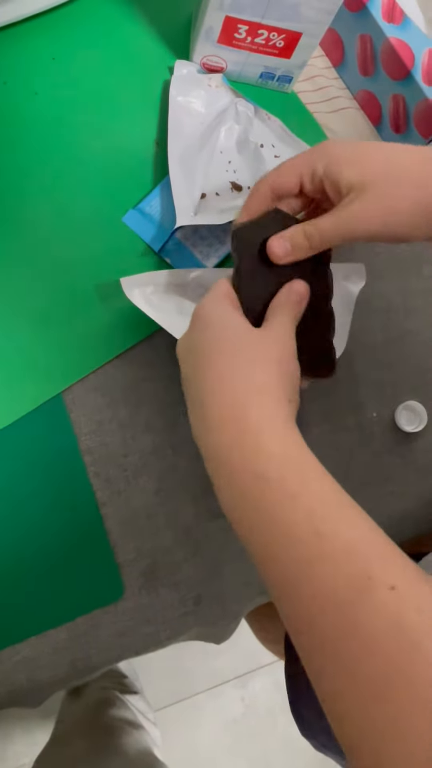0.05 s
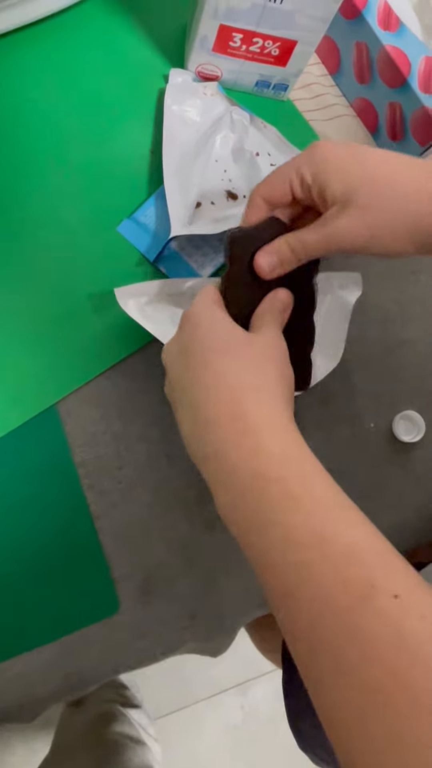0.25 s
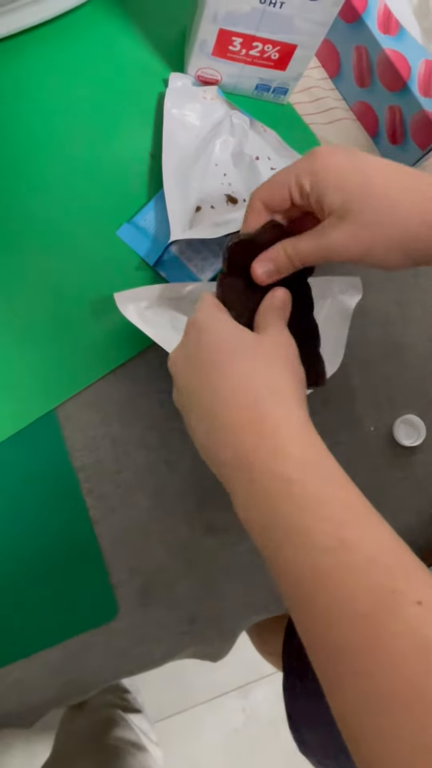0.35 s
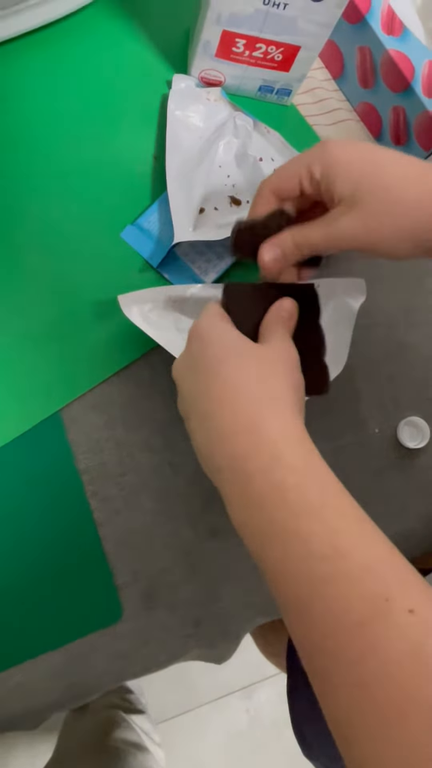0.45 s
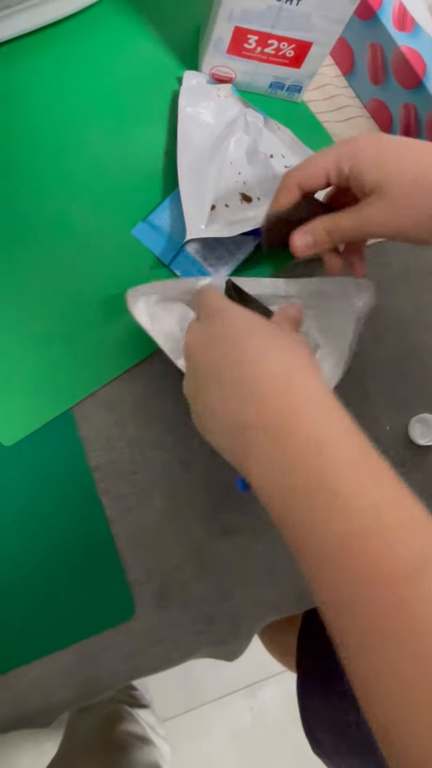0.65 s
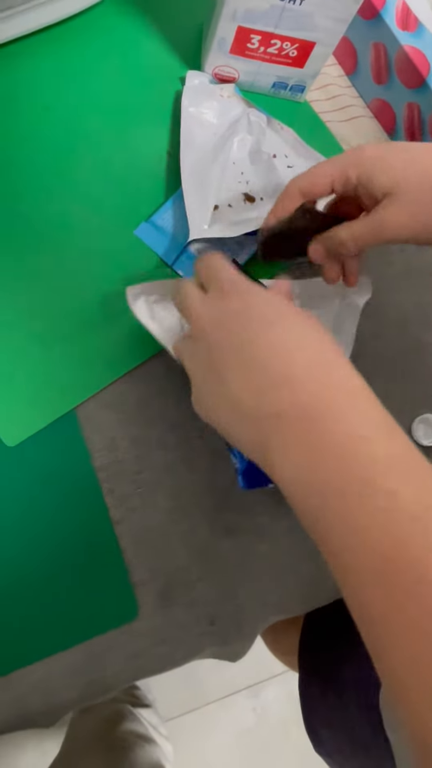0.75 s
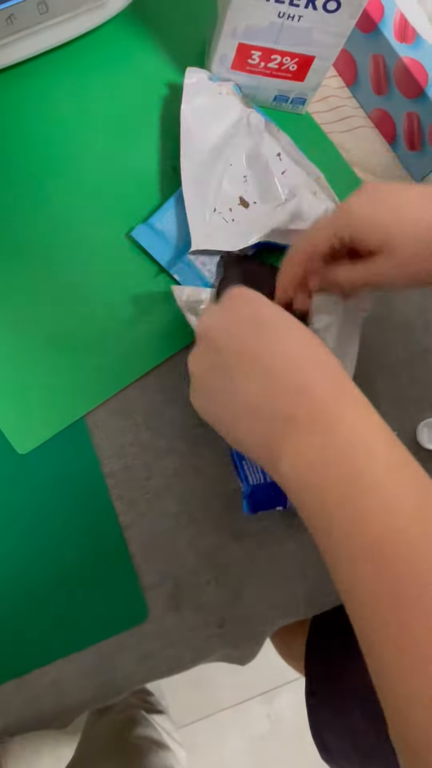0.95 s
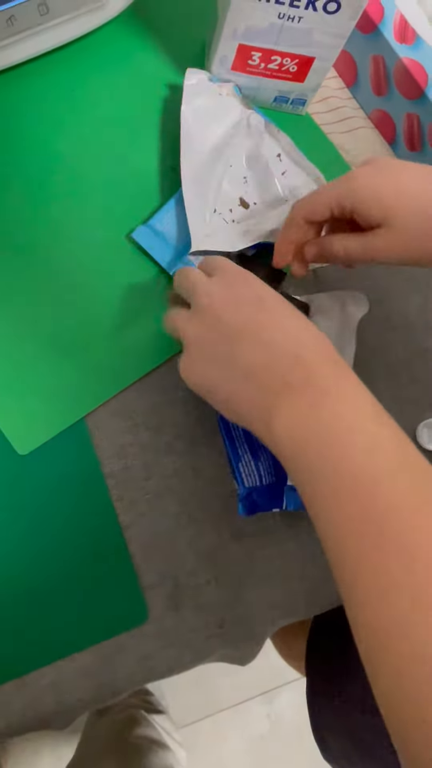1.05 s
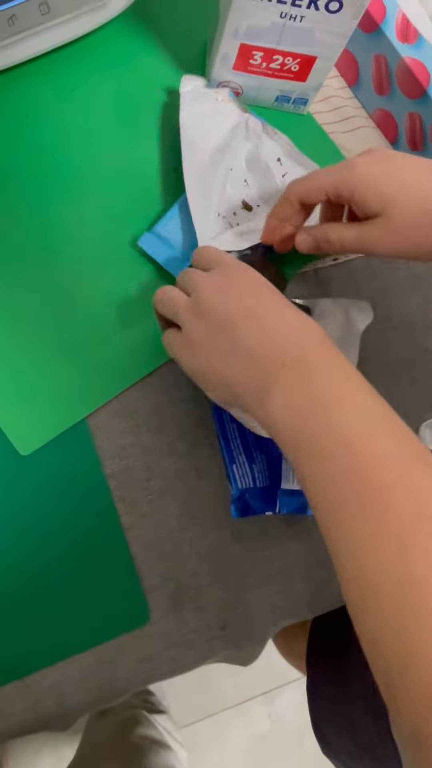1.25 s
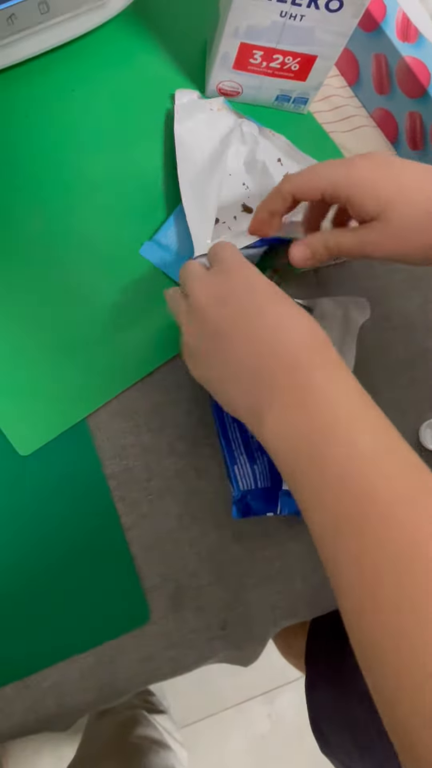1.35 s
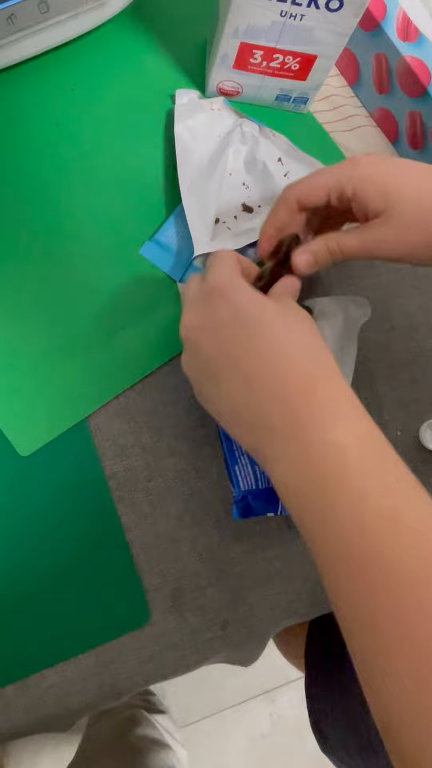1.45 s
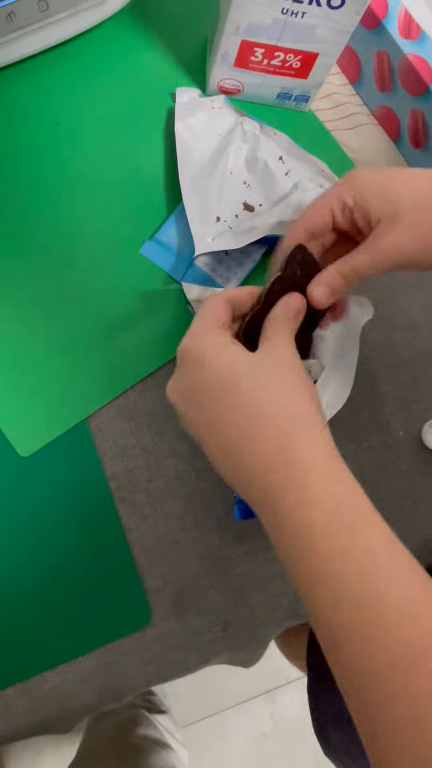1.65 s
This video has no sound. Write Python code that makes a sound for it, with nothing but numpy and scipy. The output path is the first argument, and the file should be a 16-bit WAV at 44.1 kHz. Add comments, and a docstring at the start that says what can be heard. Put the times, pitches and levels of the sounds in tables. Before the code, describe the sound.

One crisp snap of chocolate broken by hand, followed by light wrapper rustling and clicks.

```python
"""A chocolate bar is snapped by hand: brittle fracture excites its short-lived modes.
The pieces are laid in their wrapper, which crackles as it buckles and rustles as it is rubbed.
They knock, tick and scrape, and bumps set the low modes of the table ringing.
The sound reaches a close stereo microphone left side first, followed by the echoes and short
reverberation of a small kitchen, over faint noise and the hum of an appliance."""
import sys
import numpy as np
from scipy import signal
from scipy.fft import rfft, irfft
from scipy.io import wavfile

SR = 44100
rng = np.random.default_rng(int(sys.argv[2]) if len(sys.argv) > 2 else 0)


def generate_wav(signal):
    """Clip the signal to [-1, 1] and save it as 16-bit WAV at the path in sys.argv[1]."""
    frames = np.transpose(np.atleast_2d(signal))
    scaled = np.clip(frames, -1, 1) * 32767
    pcm = np.round(scaled).astype(np.int16)
    wavfile.write(sys.argv[1], SR, pcm)


N = 74970
TIME = np.arange(N) / SR

# Levels are relative: each source and path applies its own further gain.
# faint ticks lead into the snap, then the bar fractures: t/s, level/dB, contact time/ms
CRACKS = [(0.2212, -34.5, 0.061), (0.2274, -19, 0.083), (0.2298, -24, 0.13), (0.2324, -26.5, 0.078),
          (0.23467, -19, 0.016), (0.23516, -19, 0.046), (0.23549, 4.5, 0.068)]
# modes of the broken halves: f/Hz, level/dB, T60/s
BAR_MODES = [(265, -36.5, 0.015), (518, -34.5, 0.0049), (1210, -23, 0.0042), (1451, -16.5, 0.0088),
             (2624, -14, 0.016), (2813, -11, 0.018), (3100, -14.5, 0.017), (4100, -8.5, 0.0096),
             (6270, -10, 0.0035), (8630, -18, 0.0072), (11700, -25.5, 0.004), (14300, -22, .004)]
# the wrapper buckles: t/s, level/dB, body offset/dB, treble offset/dB, air offset/dB
BUCKLES = [(0.3676, -59, -2.5, 1.5, 7), (0.4632, -49, -14, 7, 5), (0.5052, -47.5, -7.5, -3.5, -7),
           (0.5209, -58, 2, 12.5, 12.5), (0.5575, -42.5, -2, -10, -20), (0.5705, -43, -2, -3, -1.5),
           (0.5991, -36, 0, -16, -15), (0.6023, -39.5, -2, -3, -5), (0.6152, -33, -8, -3, -7),
           (0.627, -65, -14, -2, -4), (0.6453, -41, 3.5, 9.5, -8), (0.656, -29.5, -14, -19, -19),
           (0.6604, -35.5, -29, -0.5, -3.5), (0.6709, -36, -12, -17, -20), (0.6792, -34, 3.5, -7.5, -18),
           (0.6977, -40.5, -29, -2, -19), (0.7023, -34.5, -24, -8, -23), (0.7172, -39, -30, -10, -23),
           (0.7462, -40, 0, -3, -17), (0.7519, -35, -4.5, -3.5, -16), (0.762, -35, -13, -7, -3.5),
           (0.781, -33, -7.5, 2.5, 0.5), (0.8797, -43, -4.5, -7.5, -22), (0.9389, -35.5, -8, -2, -24),
           (0.9529, -36, 1, -15, -27), (0.9575, -45, -5, -22, -24), (0.9617, -48, -9, -3, -19),
           (1.0656, -51.5, 2, 1.5, -31.5), (1.0821, -39, -17, 1.5, 0), (1.085, -40, -16, 3.5, 2),
           (1.093, -44, -7, 5, 9), (1.1049, -43.5, -5.5, 2.5, -1), (1.1698, -41.5, -9, -16, -9),
           (1.1824, -49.5, -6, 10, -8), (1.1918, -39.5, 0, 1, -8), (1.1945, -44.5, 5.5, 6, 4),
           (1.2019, -44, 1, 7, 8.5), (1.2147, -39, -4, -5, -21), (1.22, -38.5, -20, 5, -1.5),
           (1.2278, -65, -1, -5, 0), (1.2602, -50.5, -10, 2, 20), (1.263, -37, -13, 4.5, 3.5),
           (1.3629, -49, 0.5, -6.5, -12), (1.5372, -61, -3, 8, 6.5)]
# the wrapper is rubbed: peak t/s, half-width/s, level/dB, tilt/(dB per octave)
RUBS = [(0.564, 0.077, -55.5, -0.5), (0.583, 0.025, -49.5, -1), (0.662, 0.041, -43.5, 0.5),
        (0.728, 0.0098, -52, 3.5), (0.771, 0.04, -44.5, -2.5), (0.85, 0.039, -50, 0.5),
        (0.922, 0.014, -44.5, -0.5), (0.956, 0.015, -41.5, -2.5), (1.022, 0.053, -57, -1.5),
        (1.094, 0.026, -46, -2.5), (1.16, 0.045, -58, 0), (1.194, 0.037, -45.5, -1),
        (1.283, 0.082, -53.5, -3), (1.402, 0.16, -70, -1.5), (1.586, 0.07, -75.5, 3)]
# spectrum of the rustle as heard, with a dip near 10 kHz: f/Hz, level/dB
RUSTLE_SPECTRUM = [(100, 0), (250, -1.5), (600, 0), (1100, -3), (1800, 3.5), (2700, 1.5), (4000, -4),
                   (7000, -3.5), (10000, -15), (15200, -3.5), (17000, -22)]
# a piece is set down: t/s, level/dB, contact time/ms
LANDINGS = [(.6795, -17.5, 0.34), (.953, -29, 0.18), (1.3628, -27, 0.54), (1.3665, -12, 0.9)]
# modes of a piece on the wrapper and table top: f/Hz, level/dB, T60/s
LANDING_MODES = [(392, -23.5, 0.026), (637, -19, 0.012), (870, -16.5, 0.006)]
# hard bits of chocolate meet: t/s, level/dB, contact time/ms
TICKS = [(0.4642, -42.5, 0.037), (1.2637, -31.5, 0.028)]
# modes of a small piece: f/Hz, level/dB, T60/s
PIECE_MODES = [(2090, -2.5, 0.021), (3700, -2, .009), (4630, -3, 0.0057), (7100, 9, 0.005)]
# the pieces slide on each other: peak t/s, half-width/s, level/dB
SCRAPES = [(0.914, 0.011, -40.5)]
# hands and chocolate bump the table: t/s, level/dB, contact time/ms
BUMPS = [(0.247, -48, 1.7), (0.298, -39, 6.5), (0.597, -46.5, 0.83), (.645, -44, 0.77), (.679, -43.5, 0.15),
         (0.763, -47, 0.92), (0.824, -48, 0.34), (.945, -47, 1.8), (1.111, -51, 5.2), (1.175, -37, 3.3),
         (1.215, -39, 2.3), (1.244, -48, 2.3), (1.364, -56, 0.068)]
# modes of the table: f/Hz, level/dB, T60/s
TABLE_MODES = [(58.5, -13, 0.6), (100, -16.5, 0.1), (137.3, 1, 0.24), (188, -6, 0.12), (228, 0.5, 0.13),
               (282, -16, 0.049), (810, -13.5, 0.055)]
# phase lag at the far, right side of the microphone: f/Hz, lag/rad
RIGHT_LAG = [(100, 0), (340, -0.2), (680, 1), (1000, 7.5), (1700, 7), (2700, 7.5), (3300, 8.5), (4300, 8),
             (5300, 12), (7700, 14.5), (10500, 16.5), (13500, 17), (16000, 21.5)]
# reflections from table top and walls: delay/s, level/dB
ECHOES = [(.0030, -32), (.0056, -23.5), (.0069, -20), (.0118, -27), (0.0234, -20.5), (.0240, -29)]
# one standing wave of the kitchen: f/Hz, level/dB, T60/s
ROOM_MODE = (410, -53, .35)
# reverberation time: f/Hz, T60/s
ROOM_T60 = [(150, 0.24), (500, 0.24), (1300, 0.34), (2500, 0.24), (6000, 0.3), (15000, 0.15)]
# spectrum of the reverberation: f/Hz, level/dB
ROOM_SPECTRUM = [(100, 0.5), (400, 6.5), (1200, 3), (1950, -0.5), (2800, 1.5), (4500, 5), (7000, -4),
                 (10500, 4), (14500, -0.5)]
# left-right likeness of diffuse sound: f/Hz, correlation (clipped to +-1 in use)
CORRELATION = [(60, 0.98), (130, 0.91), (290, 0.34), (680, -0.38), (1300, -0.5), (2600, -0.57),
               (5000, -0.2), (8000, 0.34), (10500, -1.7), (14000, 0.61)]
# spectrum of the room noise: f/Hz, level/dB
NOISE_SPECTRUM = [(25, -12.5), (50, -4.5), (100, -5), (175, -11.5), (260, -14), (420, -18.5), (600, -25),
                  (950, -25), (1400, -37), (2000, -32.5), (3000, -37), (6000, -49), (10000, -53.5),
                  (15000, -45.5)]
# tones of the appliance: f/Hz, level/dB
HUM_TONES = [(54, -67), (97, -67.5), (269, -73.5)]


def snap():
    """Brittle fracture: cracks excite the bar's modes, and tiny fractures spray as it gives way."""
    break_s, spray_decay_s = 0.2345, 0.0015
    # so small a body radiates no bass
    highpass = signal.butter(3, 255, "high", fs=SR, output="sos")
    out = from_db(-3.5) * signal.sosfilt(highpass, struck(CRACKS, BAR_MODES))
    spray = band(rng.standard_normal(N), 5000, 19000) * np.exp(-TIME / spray_decay_s)
    add(out, break_s, from_db(-17) * spray)
    return out


def reflected_crack(tail):
    """Directivity: the fracture faces radiate sideways and are heard only by way of the room."""
    return reverberate(from_db(-6.5) * band(blows(CRACKS), 2400, 9000), tail)


def wrapper_crackle():
    """Buckling: each sudden fold releases a noise burst of a few milliseconds with its own spectrum."""
    lead_s, rise_s, fall_s, grain_db = 0.004, 0.000097, 0.0014, -0.5
    t = np.maximum(TIME[:SR // 50] - lead_s, 0)
    envelope = (1 - np.exp(-t / rise_s)) * np.exp(-t / fall_s)
    out = np.zeros(N)
    for s, db, body, treble, air in BUCKLES:
        white, grain = rng.standard_normal((2, len(t)))
        burst = whiten(envelope * white * from_db(grain_db * grain), share=0.55)
        bands = [(583, 1260, body - 11), (1554, 3190, -8.5),
                 (3750, 9670, treble - 8), (9300, 15100, air - 9.5)]
        for low_hz, high_hz, band_db in bands:
            add(out, s - lead_s, from_db(db + band_db) * rms_one(band(burst, low_hz, high_hz)))
    return out


def wrapper_rustle():
    """Superposition: the clicks of many tiny creases merge into one swell of noise for each rub."""
    return sum(swell(s, half_s, db) * rms_one(colour(clicks(per_s=3500), RUSTLE_SPECTRUM, tilt_db))
               for s, half_s, db, tilt_db in RUBS)


def piece_knocks():
    """Impact: a landing cushioned by the wrapper knocks low; brief, bare contacts tick high."""
    return struck(LANDINGS, LANDING_MODES) + struck(TICKS, PIECE_MODES)


def piece_scrape():
    """Stick-slip friction: chocolate on chocolate gives dense, soft slips in a middle band."""
    slips = rms_one(band(clicks(per_s=1600), 1980, 3895))
    return sum(swell(*row) for row in SCRAPES) * slips


def table_bumps():
    """Free vibration: each bump excites the table's low modes in slightly different proportions."""
    spread_db = rng.normal(0, 1.2, (len(BUMPS), len(TABLE_MODES)))
    out = np.zeros(N)
    for mode, offsets_db in zip(TABLE_MODES, spread_db.T):
        force = blows([(s, db + offset, ms) for (s, db, ms), offset in zip(BUMPS, offsets_db)])
        out += ring(force, *mode)
    return out


def in_kitchen(x, tail, wet_db, echo_db):
    """Multipath propagation: direct sound, dull early echoes, a standing wave and reverberation."""
    out = np.array([x, at_right(x)])
    dull = signal.sosfilt(signal.butter(2, 4600, fs=SR, output="sos"), out)
    for k, (s, db) in enumerate(ECHOES):
        echo = np.array([delay(side, s) for side in dull])
        out += from_db(echo_db + db) * echo[::(-1) ** k]  # from alternate sides
    return out + ring(x, *ROOM_MODE) + from_db(wet_db) * reverberate(x, tail)


def at_right(x):
    """Path difference: the far side of the microphone receives a frequency-dependent phase lag."""
    lag = at_hz(RIGHT_LAG, np.fft.rfftfreq(2 * N, 1 / SR))
    return irfft(rfft(x, 2 * N) * np.exp(-1j * lag))[:N]


def room_tail():
    """Reverberation: the diffuse impulse response decays exponentially, each octave at its own rate."""
    build_s = 0.00053
    noise, hz = rfft(diffuse_noise()), np.fft.rfftfreq(N, 1 / SR)
    centres_hz = 125 * 2. ** np.arange(8)
    tail = 0
    for centre, selector in zip(centres_hz, np.eye(len(centres_hz))):
        octave_gain = at_hz(np.c_[centres_hz, selector], hz) * from_db(at_hz(ROOM_SPECTRUM, hz))
        decay = from_db(-60 * TIME / at_hz(ROOM_T60, centre))
        tail = tail + irfft(noise * octave_gain, N) * decay
    return rms_one(tail * (1 - np.exp(-TIME / build_s))) / np.sqrt(N)


def background():
    """Steady ambient field: an appliance's line spectrum over low, diffuse room noise."""
    hum = sum(np.sqrt(2) * from_db(db) * np.sin(2 * np.pi * (hz * TIME + rng.random()))
              for hz, db in HUM_TONES)
    return hum + from_db(-60) * rms_one(colour(diffuse_noise(), NOISE_SPECTRUM))


def diffuse_noise():
    """Spatial coherence: white noise whose two sides are most alike in the bass."""
    alike = np.clip(at_hz(CORRELATION, np.fft.rfftfreq(N, 1 / SR)), -1, 1)
    mid, side = rfft(rng.standard_normal((2, N)))
    return irfft(np.sqrt(1 + alike) * mid + np.sqrt(1 - alike) * side * [[1], [-1]], N)


def struck(rows, modes):
    """Modal superposition: a body's response to blows is the sum of its modes."""
    force = blows(rows)
    return sum(ring(force, *mode) for mode in modes)


def blows(rows):
    """Force pulses: a longer contact spreads the same impulse and gives a duller sound."""
    out = np.zeros(N)
    for s, db, contact_ms in rows:
        push = np.exp(-TIME[:SR // 20] * 1000 / contact_ms)
        add(out, s, from_db(db) * push / push.sum())
    return out


def ring(force, hz, db, t60):
    """Damped oscillator: one mode, falling 60 dB in t60 seconds."""
    r, w = from_db(-60 / (t60 * SR)), 2 * np.pi * hz / SR  # pole radius and angle
    return from_db(db) * signal.lfilter([1, -r * np.cos(w)], [1, -2 * r * np.cos(w), r * r],
                                        force + 1e-18)


def clicks(per_s, spread_db=2):
    """Shot noise: independent clicks of uneven size and random sign."""
    sizes = from_db(spread_db * np.minimum(rng.exponential(1, N), 4)) * rng.choice([-1, 1], N)
    return sizes * (rng.random(N) < per_s / SR)


def swell(s, half_s, db):
    """Gaussian envelope, down to 1/e at half_s either side of its peak."""
    return from_db(db) * np.exp(-((TIME - s) / half_s) ** 2)


def whiten(x, share):
    """Partial whitening: shrink the spectrum's peaks and holes, in dB, by this share."""
    spectrum = rfft(x)
    return irfft(spectrum / (np.abs(spectrum) + 1e-9) ** share, len(x))


def colour(x, spectrum, tilt_db=0):
    """Spectral shaping, with a tilt in dB per octave about 2500 Hz."""
    hz = np.fft.rfftfreq(N, 1 / SR)
    octaves = np.log2(np.maximum(hz, 300) / 2500)
    return irfft(rfft(x) * from_db(at_hz(spectrum, hz) + tilt_db * octaves), N)


def reverberate(x, tail):
    """Convolution with the room's stereo impulse response."""
    return signal.fftconvolve(x[None], tail, axes=1)[:, :N]


def band(x, low_hz, high_hz):
    """Causal band-pass filtering."""
    return signal.sosfilt(signal.butter(3, [low_hz, high_hz], "band", fs=SR, output="sos"), x)


def delay(x, s):
    """Linear phase shift: a delay by any fraction of a sample."""
    return irfft(rfft(x, 2 * N) * np.exp(-2j * np.pi * np.fft.rfftfreq(2 * N, 1 / SR) * s))[:N]


def add(out, s, sound):
    """Superpose a sound starting at s seconds."""
    i = int(s * SR)
    out[i:i + len(sound)] += sound[:N - i]


def at_hz(points, hz):
    """Interpolation on a log-frequency axis."""
    f, values = np.transpose(points)
    return np.interp(np.log(np.maximum(hz, 1)), np.log(f), values)


def rms_one(x):
    """Normalisation to unit rms."""
    return x / np.sqrt(np.mean(x ** 2) + 1e-20)


def from_db(db):
    """Level to amplitude ratio."""
    return 10 ** (np.asarray(db) / 20)


def scene():
    """Superposition of the snap, the handling and the table in one room."""
    tail = room_tail()
    fracture = in_kitchen(snap(), tail, wet_db=-8.5, echo_db=-2) + reflected_crack(tail)
    handling = wrapper_crackle() + wrapper_rustle() + piece_scrape() + piece_knocks()
    return (fracture + in_kitchen(handling, tail, wet_db=-4.5, echo_db=-1)
            + in_kitchen(table_bumps(), tail, wet_db=-1.5, echo_db=-20.5) + background())


def record(dry):
    """Band limiting: the deepest bass and the top of the treble are cut."""
    low_hz, high_hz = 42, 16150
    x = signal.sosfilt(signal.butter(3, low_hz, "high", fs=SR, output="sos"), dry)
    return signal.sosfilt(signal.ellip(10, .2, 80, high_hz, fs=SR, output="sos"), x)


dry = scene()
out = record(dry)
generate_wav(out)
```